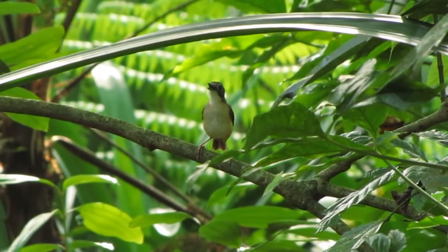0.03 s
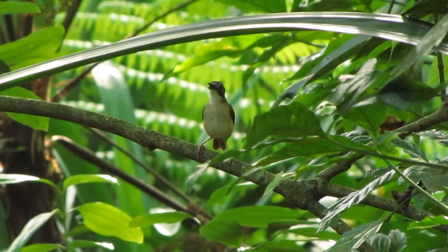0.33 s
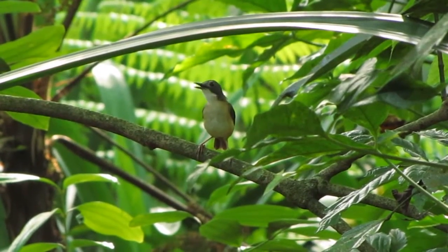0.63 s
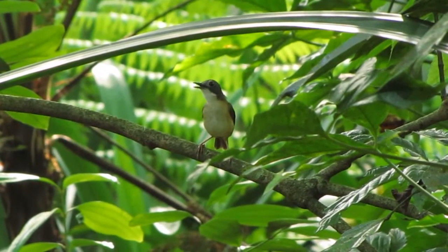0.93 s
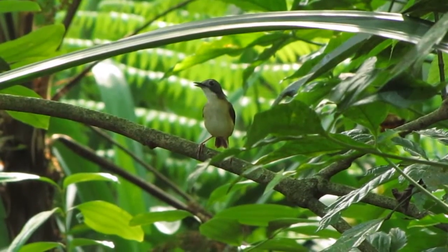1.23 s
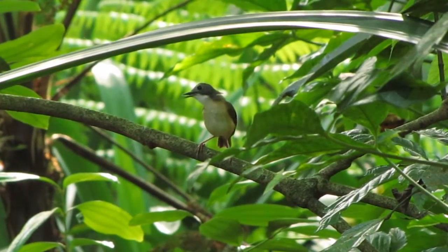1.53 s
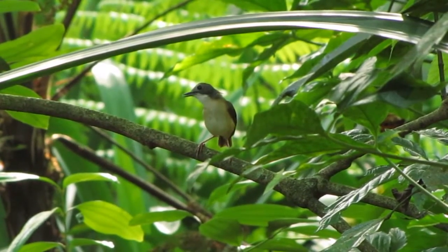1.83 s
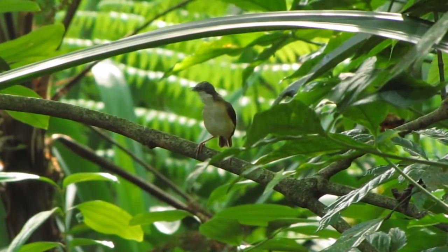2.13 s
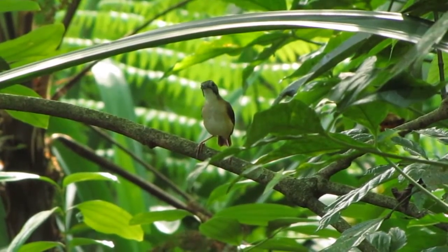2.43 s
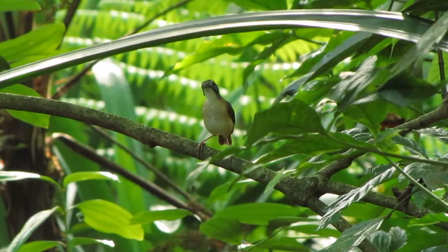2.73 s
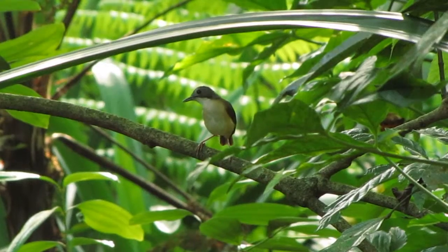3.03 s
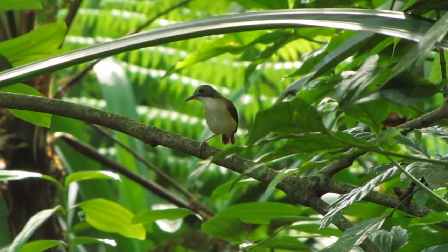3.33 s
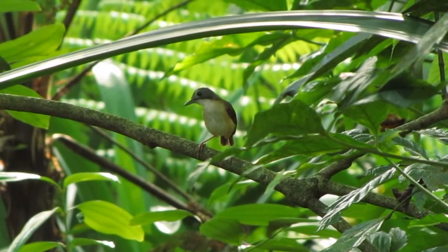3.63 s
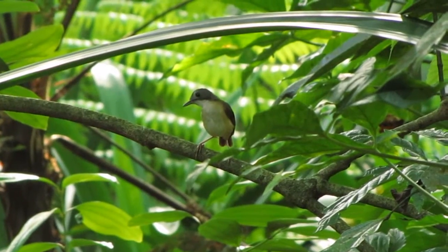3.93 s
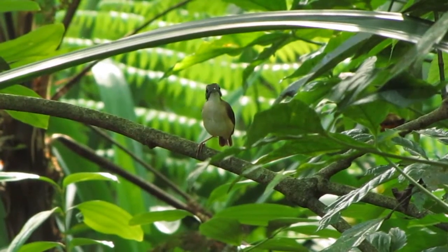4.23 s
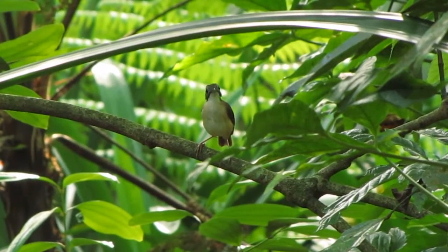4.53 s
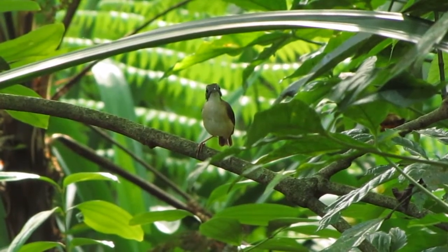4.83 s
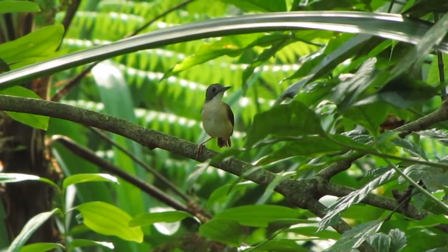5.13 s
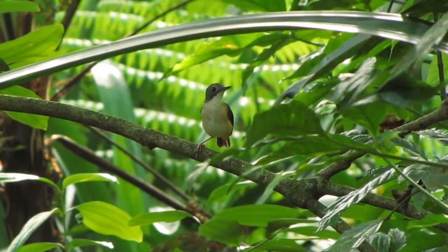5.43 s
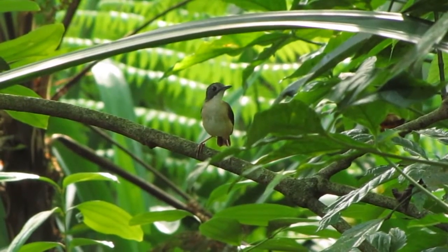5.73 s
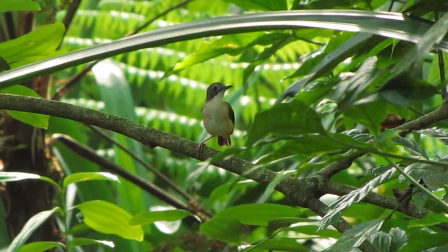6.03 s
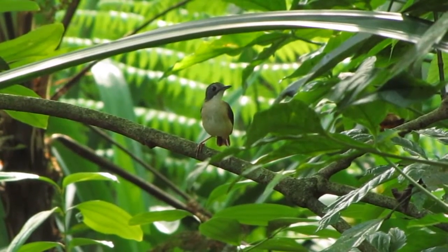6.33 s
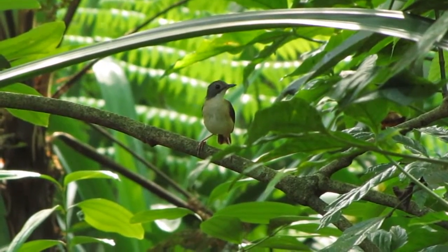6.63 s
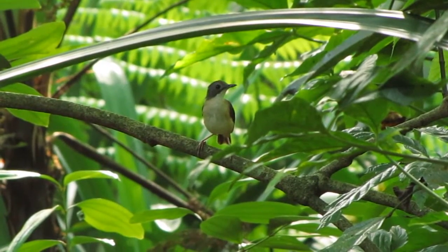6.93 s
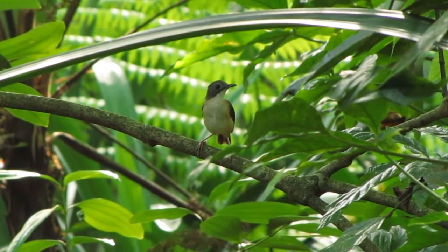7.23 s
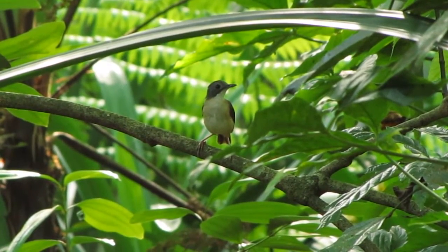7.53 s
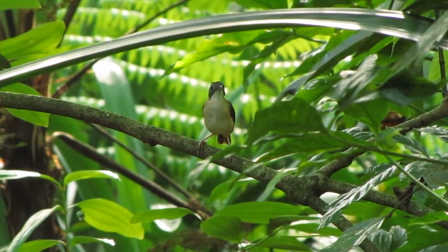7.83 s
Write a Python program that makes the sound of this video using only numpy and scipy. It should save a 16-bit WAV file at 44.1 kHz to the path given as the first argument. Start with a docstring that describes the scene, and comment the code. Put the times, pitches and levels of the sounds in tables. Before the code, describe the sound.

Clear birdsong slides down, sweeps upward and settles into long whistles, echoing over a chirping cricket and droning cicadas.

```python
"""A babbler, a songbird perched in dense forest, sings falling slurs (sliding notes), then upward sweeps
that slow down into long, sinking whistles. Each note is a nearly pure tone from the bird's voice box.
Its mate whistles and slurs in duet, other birds sing further off, and leaves and trunks echo every note.
Behind them a cricket chirps with its wings and cicadas drone, with faint croaks, a dull rustle,
a few soft taps among the leaves, a wash of forest air and a low hum."""
import sys
import numpy as np
from scipy import signal
from scipy.fft import rfft, irfft, next_fast_len
from scipy.io import wavfile
from scipy.ndimage import uniform_filter1d, map_coordinates

SR = 44100
rng = np.random.default_rng(int(sys.argv[2]) if len(sys.argv) > 2 else 0)


def inscribe(sig):
    """Save sig as 16-bit PCM at rate SR to the path in sys.argv[1].

    A 1-D sig is mono; a 2-D sig holds one channel per row.
    Samples are clipped to [-1, 1] before scaling.
    """
    pcm = np.round(np.clip(np.atleast_2d(sig).T, -1, 1) * 32767)
    wavfile.write(sys.argv[1], SR, pcm.astype(np.int16))


N = 357210
TIME = np.arange(N) / SR

# Levels in the tables are relative: the functions turn them up or down afterwards.
# The babbler's opening slurs. Each row: start in seconds, length in seconds, first pitch in Hz,
# level in dB.
OPENING_SLURS = [(0.138, 0.044, 3250, -31), (0.286, 0.16, 3170, -25), (0.559, .29, 3280, -24),
                 (0.953, .39, 3277, -21.5), (1.464, 0.49, 3336, -20)]
# The babbler's upward sweeps. Each row: start in seconds, length in seconds, level in dB.
SWEEP_NOTES = [(2.057, 0.031, -20), (2.104, .026, -16.5), (2.143, .027, -14.5), (2.198, .025, -14.5),
               (2.252, .024, -13.5), (2.336, .026, -15), (2.409, .031, -18), (2.488, 0.036, -24),
               (2.581, 0.022, -17.5), (2.67, .027, -18), (2.754, 0.028, -16), (2.85, .026, -16.5),
               (2.95, .032, -16.5), (3.081, 0.047, -17.5), (3.24, 0.083, -17), (3.43, 0.13, -17),
               (3.655, 0.15, -16.5), (3.889, 0.16, -15), (4.134, 0.16, -16), (4.375, 0.16, -15.5)]
# The pitch a sweep climbs to, mostly sinking as the song goes on. Each row: time in seconds, pitch in Hz.
SWEEP_TOPS = [(2.05, 4570), (2.35, 4644), (2.6, 4263), (2.95, 4025), (3.45, 3930), (4.14, 3777),
              (4.38, 3410)]
# How the sweeps stand out from their echo. Each row: time in seconds, gain of the direct sound in dB.
SWEEP_CLARITY = [(2.25, 0), (2.8, -0.5), (3.4, 1.5), (4.2, 1)]
# The beak aims the treble into the leaves. Each row: frequency in Hz, extra echo in dB.
BEAK_BEAM = [(3000, 1.5), (4300, 9.5), (9000, 6)]
# The babbler's closing whistles. Each row: start in seconds, length in seconds, first pitch in Hz,
# last pitch in Hz, droop below that in Hz, level in dB, third harmonic's level in dB, flutter in dB.
CLOSING_WHISTLES = [(4.621, 0.28, 2530, 2850, 130, -23, -53, 7.5),
                    (4.893, 0.42, 2563, 2478, 2.1, -22, -45, 1),
                    (5.302, 0.34, 2458, 2426, 10.6, -18.5, -27, 2.5),
                    (5.678, .355, 2379, 2356, 72, -18, -30.5, -3.3),
                    (6.138, .385, 2358, 2307, 115, -18.5, -26.5, 0.5)]
# The pitch path of a sweep, then of a slur. Each row: share of the note's length, share of the way
# from first to last pitch.
SWEEP_PATH = [(0, 0), (.06, .19), (.16, .375), (.28, .49), (.53, .605), (.76, .73), (.88, .85), (1, 1)]
SLUR_PATH = [(0, 0), (.11, .13), (.23, .24), (.35, .4), (.48, .625), (.61, .8), (.79, .925), (1, 1)]
# A note is loudest as it glides through the throat's resonance; one table for sweeps, one for slurs.
# Each row: pitch in Hz, gain in dB.
SWEEP_THROAT = [(1700, 1), (2100, -8.5), (2550, -5.5), (2900, 3.5), (3300, -2.5), (3650, -8.5),
                (4400, -10.5)]
SLUR_THROAT = [(1550, -10.5), (1750, -8.5), (2000, 0), (2400, 0.5), (2900, 9.5), (3300, 3.5), (3700, 2)]
# The mate's slurs. Each row: start in seconds, length in seconds, first pitch in Hz, level in dB.
MATE_SLURS = [(2.123, 0.069, 2750, -35.5), (2.173, 0.073, 2460, -40), (2.268, 0.035, 2440, -35),
              (2.411, .073, 3070, -35), (2.485, 0.052, 2220, -35.5), (2.572, 0.02, 2230, -33.5),
              (2.614, 0.02, 2300, -37), (2.733, 0.056, 2810, -37.5), (2.92, 0.034, 2950, -38),
              (3.056, 0.047, 3130, -37.5), (3.241, 0.071, 3370, -34.5), (3.431, .176, 3640, -34.5),
              (3.793, 0.18, 3150, -35), (4.672, .07, 2740, -35.5), (4.741, .03, 2550, -31.5),
              (4.805, 0.023, 2230, -35), (4.894, 0.018, 2020, -31), (5.014, 0.12, 2630, -36),
              (5.355, 0.088, 2660, -32.5), (6.54, .21, 3580, -37.5), (6.863, .36, 3624, -35.5),
              (7.468, .25, 3006, -36.5)]
# The mate's whistles. Each row: start in seconds, length in seconds, first pitch in Hz,
# last pitch in Hz, droop below that in Hz, level in dB.
MATE_HELD_NOTES = [(0, 0.43, 2635, 2563, 4.5, -19), (.425, 0.37, 2522, 2460, 9.5, -14.5),
                   (0.828, 0.269, 2473, 2449, 39, -11)]
# Distant birds, together with the short first push of the mate's last slur at 7.32 s; then birds so deep in the
# forest that only their echo arrives. Each row: start in seconds, length in seconds, first pitch in Hz, last
# pitch in Hz, level in dB.
DISTANT_NOTES = [(0, 0.082, 3060, 3700, -27.5), (.166, .12, 2870, 3270, -24.5),
                 (.38, 0.54, 2924, 2970, -26), (.394, 0.14, 3700, 3670, -32),
                 (.68, 0.26, 2705, 2970, -27.5), (1.005, 0.27, 2620, 2757, -24.5),
                 (1.13, 1.72, 3047, 3094, -32), (1.38, 0.35, 2442, 2626, -29.5),
                 (1.912, 0.412, 2334, 2396, -31.5), (4.676, 0.99, 3118, 3103, -36.5),
                 (4.8, 0.61, 650, 671, -53), (5.596, 0.276, 3730, 3670, -36), (6.47, 0.97, 2975, 3016, -29),
                 (7.322, 0.078, 3640, 3200, -27.5), (7.528, 0.15, 3060, 3070, -31)]
ECHO_ONLY_NOTES = [(.3, .14, 4260, 3720, -38.5), (5.42, 0.22, 4160, 3730, -39)]
# How long the forest rings. Each row: frequency in Hz, seconds the echo takes to fall by 60 dB.
ECHO_TIMES = [(500, 0.19), (3000, 0.96), (5000, 1), (9000, 0.55)]
# The cricket's runs of chirps. Each row: start in seconds, end in seconds, seconds from chirp to chirp.
CRICKET_RUNS = [(.066, 3.15, .229), (3.325, 4.25, .266), (4.549, 4.9, .232), (5.26, 6.6, .302)]
# How loud the cricket is. Each row: time in seconds, level in dB.
CRICKET_LOUDNESS = [(.52, -29), (.8, -24.5), (2.1, -19.5), (3.6, -21), (3.9, -29), (4.55, -24.5),
                    (4.8, -27), (5.6, -30), (6.5, -23.5)]
# The steady chorus of insects and birds. Each row: centre of a band in Hz, width in Hz, level in dB.
CHORUS_BANDS = [(2993, 130, -34.5), (2730, 434, -38.5), (3750, 20, -48.5), (5400, 530, -39),
                (4904, 6.4, -46.5), (5010, 6.1, -44), (5340, 71, -43), (6260, 120, -42), (7480, 310, -40.5),
                (9620, 900, -47.5), (14900, 410, -58.5)]
# One insect that swells and falls back. Each row: time in seconds, level in dB.
INSECT_SWELL = [(0, -48), (1.5, -47), (2.0, -34.5), (2.7, -36.5), (3.3, -42), (4.5, -42.5), (8.1, -43.5)]
# A dull rustle coming and going. Each row: time in seconds, level in dB.
RUSTLE_LOUDNESS = [(.1, -69.5), (.4, -50), (1.4, -48), (1.9, -53.5), (2.3, -76)]
# Soft taps among the leaves. Each row: start in seconds, level in dB.
LEAF_TAPS = [(1.326, -33), (2.319, -33), (6.593, -37.5), (7.299, -32.5), (7.327, -30)]
# The tone colour of the taps, then of the forest air. Each row: frequency in Hz, level in dB.
TAP_TONE = [(60, -30), (160, -5.5), (400, -0.5), (850, 7.5), (1400, -15), (3000, -45)]
AIR_TONE = [(20, -21), (70, -3), (110, -6.5), (190, -8), (320, -0.5), (700, 1.5), (1400, -1), (2000, 0.5),
            (4200, -1), (9000, -10), (11500, -17), (13000, -69)]
# How alike the air sounds in both ears. Each row: frequency in Hz, likeness (1 means identical).
EAR_LIKENESS = [(50, 0.6), (300, 0.97), (900, 0.58), (2000, 0.53), (8000, 0.087)]

SWEEP_FROM_HZ, OPENING_TO_HZ = 1690, 1568  # where every sweep starts; where every opening slur ends
MATE_TO_HZ, MATE_TO_SHARE = 1257, .125  # the mate's slur ends on this pitch plus a share of its first
SCOOP_HZ, SCOOP_S = 197.6, 0.0138  # a whistle slides up onto its pitch
DROOP_S, FADE_DB = 0.15, 3.5  # it droops and fades just before it ends
FLUTTER_HZ, MATE_FLUTTER_DB, OVERTONE_FLUTTER_DB = 29.7, 1.2, 3.5  # a whistle's level trembles
TRILL_START_S, TRILL_PERIOD_S = 7.785, .068  # a far-off trill at the end
CHIP_S, CHIP_FROM_HZ, CHIP_TO_HZ, CHIP_DB = .035, 2800, 4030, -27.5  # each note of that trill
CROAK_START_S, CROAK_END_S, CROAK_PERIOD_S = 3.398, 6.33, .2555
TOP_HZ = 15800


def babbler_slurs():
    """The babbler opens with falling notes, each longer and louder than the one before."""
    notes = [(start, length, first, OPENING_TO_HZ, db) for start, length, first, db in OPENING_SLURS]
    voice = phrase(notes, SLUR_PATH, SLUR_THROAT, beak_db=-16.5, waver=0.0052, open_s=0.5, opening=8.5)
    direct = amp(-2.5) * arrive(voice * sides(4.5), lead_ms=0.15)
    return direct + amp(-3.5) * sides(1) * scatter(voice, leaves_db=17.5)


def babbler_sweeps():
    """The babbler's upward sweeps slow down from a trill; their echo lingers just above 3 kHz."""
    notes = [(start, length, SWEEP_FROM_HZ, at(SWEEP_TOPS, start), db)
             for start, length, db in SWEEP_NOTES]
    voice = phrase(notes, SWEEP_PATH, SWEEP_THROAT, beak_db=-9, waver=0.0088)
    direct = arrive(voice * amp(at(SWEEP_CLARITY, TIME)) * sides(8), lead_ms=0.13)
    beamed = filtered(voice, lambda hz: amp(along(BEAK_BEAM, hz)))
    echo = amp(-3) * sides(5.5) * scatter(beamed, leaves_db=12)
    ring = filtered(scatter(voice, leaves_db=-25), lambda hz: hump(hz, 3100, 112))
    return amp(-1) * (direct + echo) + amp(0.5) * sides(1.9) * ring


def babbler_whistles():
    """The babbler closes with long, sinking notes, nearly pure but for a few weak overtones."""
    voice = np.zeros(N)
    for start, length, first, last, droop, db, third_db, flutter_db in CLOSING_WHISTLES:
        phase, gain = whistle(length, first, last, droop, flutter_db, edge_s=0.033)
        overtones = np.sin(3 * phase) + amp(-21) * np.sin(4 * phase) + amp(-23) * np.sin(5 * phase)
        overtone_gain = amp(third_db + OVERTONE_FLUTTER_DB * wobble(FLUTTER_HZ)[:len(phase)])
        add(voice, start, gain * (amp(db) * np.sin(phase) + overtone_gain * overtones))
    echo = amp(-6) * sides(2) * scatter(voice, leaves_db=2)
    return arrive(voice * sides(9.5), lead_ms=0.065) + echo


def phrase(notes, path, throat, beak_db, waver, open_s=0.14, opening=0.52):
    """Gliding notes. As they near open_s in length, the beak lets out the third harmonic near 9 kHz."""
    voice = np.zeros(N)
    for start, length, first, last, db in notes:
        hz = glide(length, first, last, path)
        phase, gate = voice_box(hz, edge_s=length / 20, waver=waver)
        beak_open = np.clip(length / open_s, 0, 1) ** opening
        third_gain = amp(beak_db) * hump(3 * hz, 9160, 470) * beak_open
        tone = np.sin(phase) + third_gain * np.sin(3 * phase)
        add(voice, start, amp(db + along(throat, hz)) * gate * tone)
    return voice


def glide(length, first_hz, last_hz, path):
    """The pitch of one note as it slides smoothly along its path."""
    progress = np.linspace(0, 1, int(max(length, .01) * SR))
    share = uniform_filter1d(at(path, progress), len(progress) // 10, mode="nearest")
    return first_hz + (last_hz - first_hz) * share


def whistle(length, first_hz, last_hz, droop_hz, flutter_db, edge_s):
    """Phase and gain of a held note: it scoops up, drifts, then droops, while its level flutters."""
    t = np.arange(int(length * SR)) / SR
    drift_hz = first_hz + (last_hz - first_hz) * t / length
    scoop_hz = SCOOP_HZ * np.exp(-t / SCOOP_S)
    droop = np.sin(np.pi / 2 * np.clip(1 - (length - t) / DROOP_S, 0, 1)) ** 2
    phase, gate = voice_box(drift_hz - scoop_hz - droop_hz * droop, edge_s, waver=.0025)
    return phase, gate * amp(flutter_db * wobble(FLUTTER_HZ)[:len(t)] - FADE_DB * droop)


def voice_box(hz, edge_s, waver):
    """A bird's slightly wavering vibration: its phase, and a gate that fades it in and out."""
    t = np.arange(len(hz)) / SR
    drift = map_coordinates(rng.standard_normal(int(t[-1] * 90) + 4), [t * 90])
    phase = 2 * np.pi * np.cumsum(hz * (1 + waver * drift)) / SR
    gate = np.sin(np.pi / 2 * np.clip(np.minimum(t, t[-1] - t) / edge_s, 0, 1)) ** 2
    return phase, gate


def mate_slurs():
    """The mate answers with falling notes from deeper in the leaves."""
    notes = [(start, length, first, MATE_TO_HZ + MATE_TO_SHARE * first, db)
             for start, length, first, db in MATE_SLURS]
    voice = phrase(notes, SLUR_PATH, SLUR_THROAT, beak_db=-31, waver=0.00596)
    echo = amp(2.5) * scatter(voice, leaves_db=9)
    return amp(3.5) * (arrive(voice * sides(-6.5), lead_ms=-0.008) + echo)


def mate_whistles():
    """The mate's pure, held notes come from the right."""
    voice = np.zeros(N)
    for start, length, first, last, droop, db in MATE_HELD_NOTES:
        phase, gain = whistle(length, first, last, droop, MATE_FLUTTER_DB, edge_s=0.052)
        add(voice, start, gain * amp(db) * np.sin(phase))
    echo = amp(-5) * scatter(voice, leaves_db=0)
    return arrive(voice * sides(-3), lead_ms=-0.061) + echo


def far_birds():
    """Distant notes ring on between the trunks, along with the brief high start of the mate's last slur; the
    furthest are heard only as echo."""
    voice = far_voice(DISTANT_NOTES, waver=.0015)
    echo = amp(-5) * scatter(voice, leaves_db=0)
    trill = [(start, CHIP_S, CHIP_FROM_HZ, CHIP_TO_HZ, CHIP_DB)
             for start in np.arange(TRILL_START_S, N / SR, TRILL_PERIOD_S)]
    hidden = scatter(far_voice(list(ECHO_ONLY_NOTES) + trill, waver=.025), leaves_db=4)
    return amp(1.5) * (arrive(voice * sides(-2.8), lead_ms=-0.007) + echo) + amp(5.5) * hidden


def far_voice(notes, waver):
    """Plain whistled notes that slide evenly in pitch and have soft ends."""
    voice = np.zeros(N)
    for start, length, first, last, db in notes:
        hz = np.linspace(first, last, int(length * SR))
        phase, gate = voice_box(hz, edge_s=min(length / 5, .04), waver=waver)
        add(voice, start, amp(db) * gate * np.sin(phase))
    return voice


def scatter(sound, leaves_db):
    """The forest's uneven echo: nearby leaves throw a sound back at once, trunks later."""
    size = int(SR * .7)
    reflections = rng.standard_normal((2, size)) * (rng.random(size) < .03)
    hz, t, spectrum = signal.stft(reflections, SR, nperseg=256)
    trunks = amp(-60 * t / along(ECHO_TIMES, hz)[:, None])
    leaves = amp(leaves_db - 60 * t / 0.12)
    colour = amp(1.05 * hump(hz, 2610, 130))[:, None]
    build_up = 1 - np.exp(-t / 0.011)
    tail = signal.istft(spectrum * (trunks + leaves) * colour * build_up, SR, nperseg=256)[1]
    tail_hz = np.fft.rfftfreq(tail.shape[1], 1 / SR)
    song_band = (tail_hz > 2000) & (tail_hz < 4000)
    tail /= np.sqrt(np.mean(abs(rfft(tail)[:, song_band]) ** 2))  # average gain of 1 in this band
    return signal.fftconvolve(np.atleast_2d(sound), tail, axes=1)[:, :N]


def cricket():
    """Each chirp is a few wing strokes on one ringing pitch."""
    strokes, t = np.zeros(N), np.arange(int(.16 * SR)) / SR
    fade = np.clip((.16 - t) / .08, 0, 1)
    chirp = np.sin(np.pi * t * 26.5) ** 2 * fade  # 26.5 strokes a second
    for first, end, period in CRICKET_RUNS:
        for start in np.arange(first, end, period):
            add(strokes, start - .014, amp(at(CRICKET_LOUDNESS, start)) * chirp)
    tone = strokes * np.sin(2 * np.pi * np.cumsum(6277 + 28 * wobble(150)) / SR)
    return amp(-5) * (tone * sides(6) + amp(-4) * scatter(tone, leaves_db=5))


def cicada():
    """A high buzz made of rapid pulses in groups of four."""
    pulse_hz = 86.6 + 1.2 * wobble(3)
    cycle = 2 * np.pi * np.cumsum(pulse_hz) / SR
    pulses = unit(amp(5 * np.cos(cycle) + 2.5 * np.cos(cycle / 4)))
    return amp(-38 + 1.6 * wobble(2.57)) * pulses * band(7826, width_hz=240) * sides(3.9)


def chorus():
    """Many insects and birds blur into steady bands of noise, while one insect swells near 5.5 kHz."""
    def bands(hz):
        # Dividing by the width keeps a band's level the same however wide it is.
        return np.sqrt(sum((amp(db) * hump(hz, centre, width)) ** 2
                           * SR / (2 * width * np.sqrt(2 * np.pi))
                           for centre, width, db in CHORUS_BANDS))
    drone = filtered(rng.standard_normal((2, N)), bands)
    flicker = amp(1.77 * np.array([wobble(7), wobble(6)]))
    return drone * flicker + amp(at(INSECT_SWELL, TIME)) * band(5567, width_hz=15)


def croaks():
    """Faint, evenly spaced croaks, perhaps a frog: each is a double pulse in one low resonance."""
    pulses, t = np.zeros(N), np.arange(SR // 5) / SR
    pulse = amp(-60 * t / 0.15) * (1 - np.exp(-t / 0.008))
    for start in np.arange(CROAK_START_S, CROAK_END_S, CROAK_PERIOD_S):
        add(pulses, start, pulse)
        add(pulses, start + 0.036, amp(-17) * pulse)
    return amp(-31.5) * pulses * band(1350, width_hz=200)


def rustle():
    """A dull rustle comes and goes under the opening notes."""
    return amp(at(RUSTLE_LOUDNESS, TIME) + 3.7 * wobble(8.16)) * band(665, width_hz=106)[0]


def leaf_taps():
    """Each tap on the leaves is a puff of dull noise that dies away quickly."""
    puffs, t = np.zeros(N), np.arange(SR // 8) / SR
    for start, db in LEAF_TAPS:
        add(puffs, start, amp(db - 60 * t / 0.085) * (1 - np.exp(-t / 0.0015)))
    noise = unit(filtered(rng.standard_normal(N), lambda hz: amp(along(TAP_TONE, hz))))
    return amp(2) * puffs * noise


def forest_air():
    """A soft wash of noise: one part is shared by both ears, the other is opposite in each."""
    def split(hz):
        angle = np.arccos(np.clip(along(EAR_LIKENESS, hz), -1, 1)) / 2
        return amp(along(AIR_TONE, hz)) * [np.cos(angle), np.sin(angle)]
    shared, opposite = filtered(rng.standard_normal((2, N)), split)
    return amp(-38.5 + 0.97 * wobble(7.6)) * unit(np.array([shared + opposite, shared - opposite]))


def hum():
    """A faint 48 Hz tone whose level wavers."""
    return amp(-56.5 + 2.3 * wobble(9.4)) * np.sin(2 * np.pi * 48 * TIME)


def sides(pan_db):
    """Left and right gains, with the left louder by pan_db."""
    return amp([[pan_db / 2], [-pan_db / 2]])


def arrive(sound, lead_ms):
    """Direct sound reaches the left ear lead_ms earlier than the right."""
    return filtered(sound, lambda hz: np.exp(1j * np.pi * hz * lead_ms / 1000 * np.array([[1], [-1]])))


def amp(db):
    """Turn decibels into a gain."""
    return 10 ** (np.asarray(db) / 20)


def unit(sound):
    """Scale a sound to an average (rms) level of 1."""
    return sound / np.sqrt(np.mean(sound ** 2) + 1e-20)


def at(points, position):
    """Read between the rows of a two-column table along straight lines."""
    return np.interp(position, *np.transpose(points))


def along(points, hz):
    """Read between the rows of a frequency table, on a logarithmic scale."""
    row_hz, values = np.transpose(points)
    return np.interp(np.log(hz + 1), np.log(row_hz + 1), values)


def wobble(rate):
    """A smooth curve through `rate` random values a second."""
    return map_coordinates(rng.standard_normal(int(N * rate / SR) + 4), [TIME * rate])


def filtered(sound, response):
    """Multiply each frequency in a sound by response(hz)."""
    size = next_fast_len(N + 8192)
    return irfft(rfft(sound, size) * response(np.fft.rfftfreq(size, 1 / SR)), size)[..., :N]


def hump(hz, centre, width):
    """A bell-shaped curve around a centre frequency."""
    return np.exp(-((hz - centre) / (2 * width)) ** 2)


def band(centre_hz, width_hz):
    """A narrow band of noise, unrelated in the two ears."""
    return unit(filtered(rng.standard_normal((2, N)), lambda hz: hump(hz, centre_hz, width_hz)))


def add(track, start, sound):
    """Mix a sound into a track, starting at a time in seconds."""
    first = int(np.clip(round(start * SR), 0, N - 1))
    track[..., first:first + sound.shape[-1]] += sound[..., :N - first]


def scene():
    """The babbler, its mate and the distant birds sing over the forest's drone."""
    babbler = babbler_sweeps() + babbler_whistles() + babbler_slurs()
    birds = babbler + mate_slurs() + mate_whistles() + far_birds()
    return birds + croaks() + cricket() + cicada() + chorus() + rustle() + forest_air() + hum() + leaf_taps()


def record(dry):
    """Cut away all the treble above TOP_HZ."""
    return filtered(dry, lambda hz: hz < TOP_HZ)


dry = scene()
out = record(dry)
inscribe(out)
```